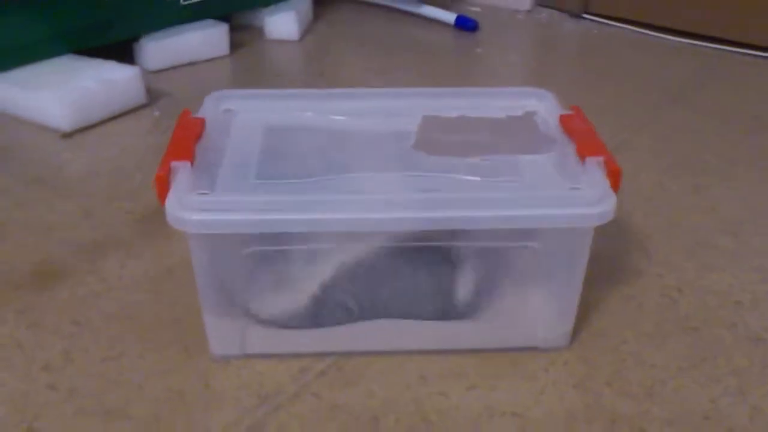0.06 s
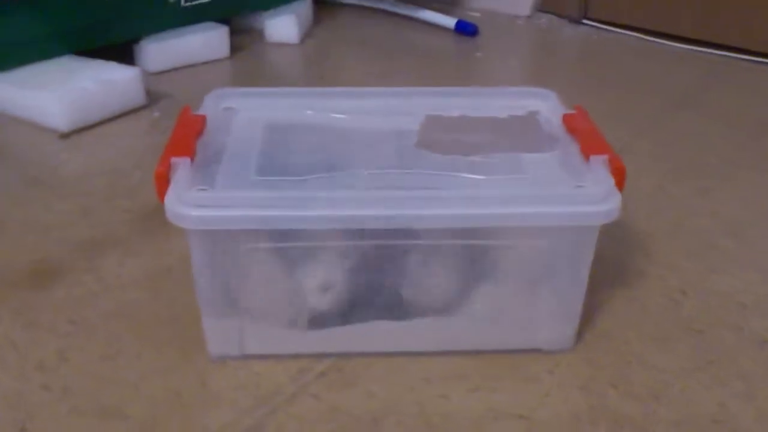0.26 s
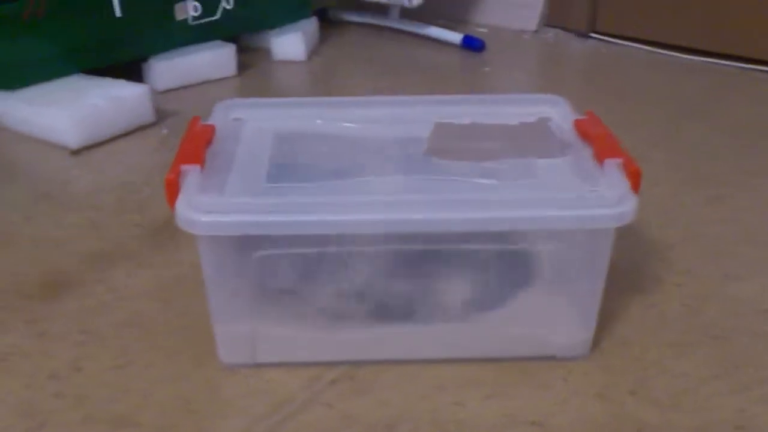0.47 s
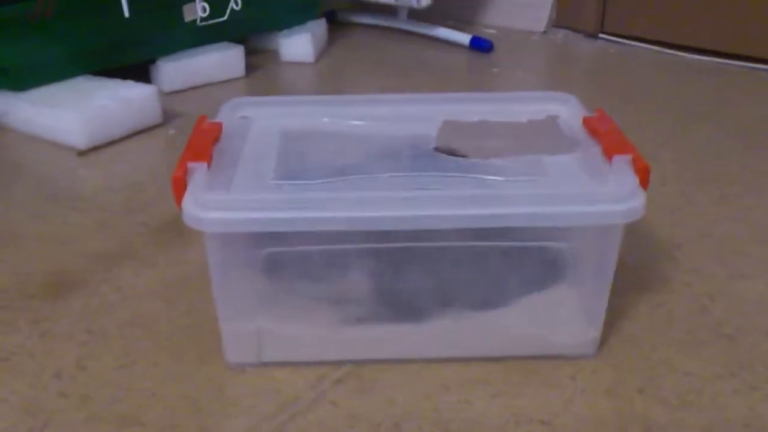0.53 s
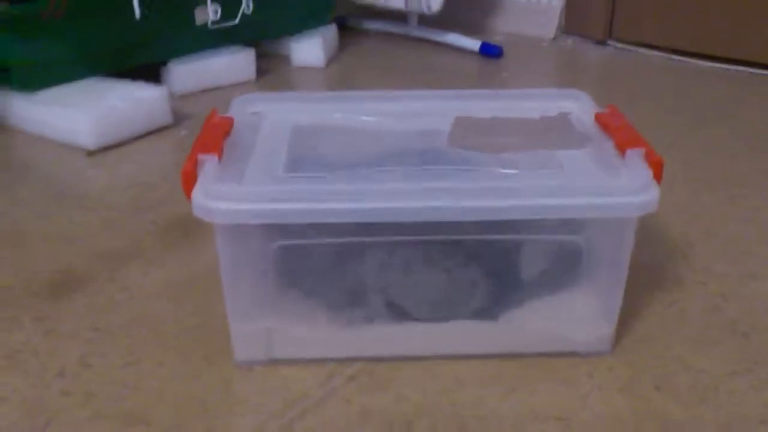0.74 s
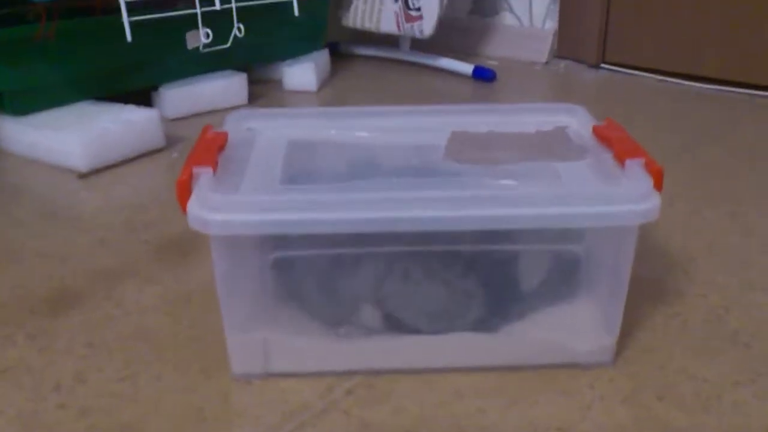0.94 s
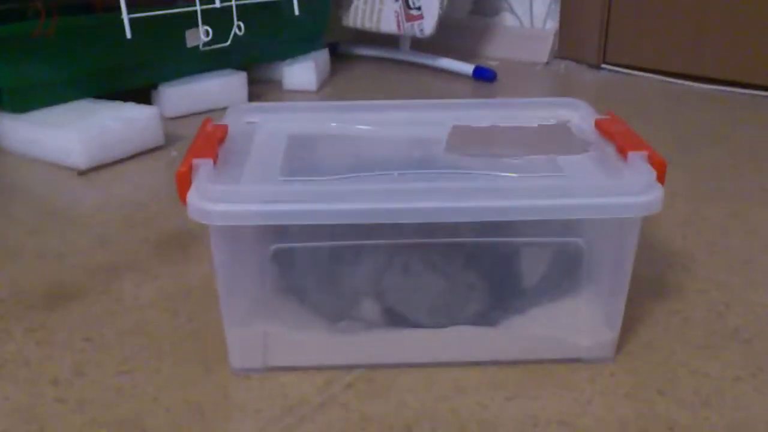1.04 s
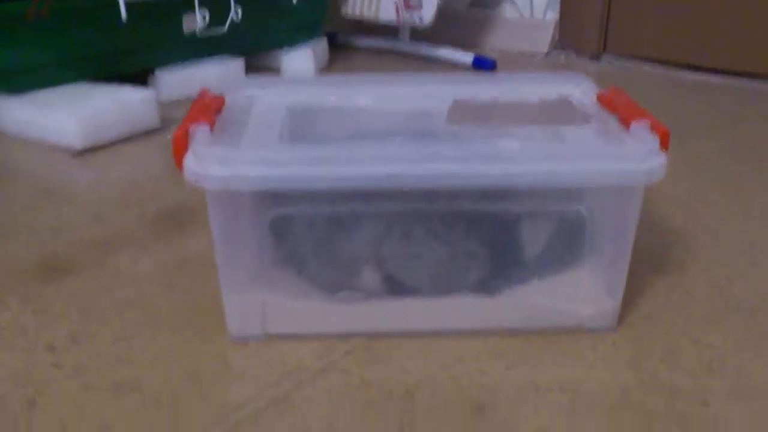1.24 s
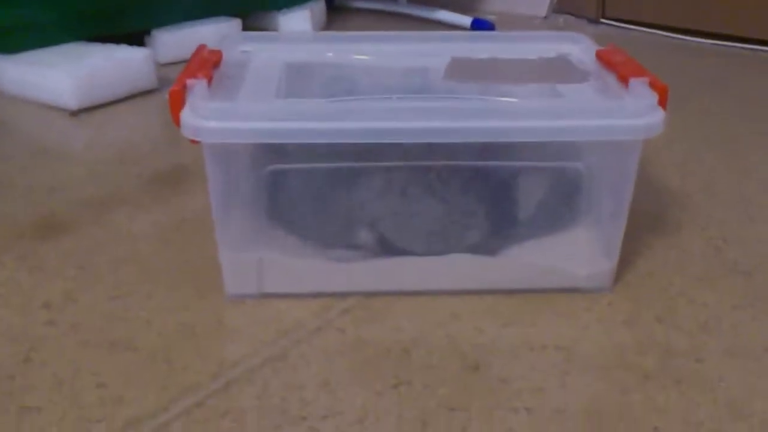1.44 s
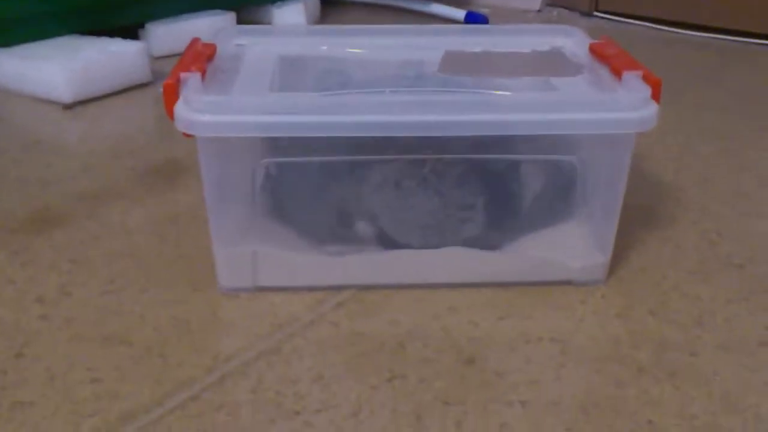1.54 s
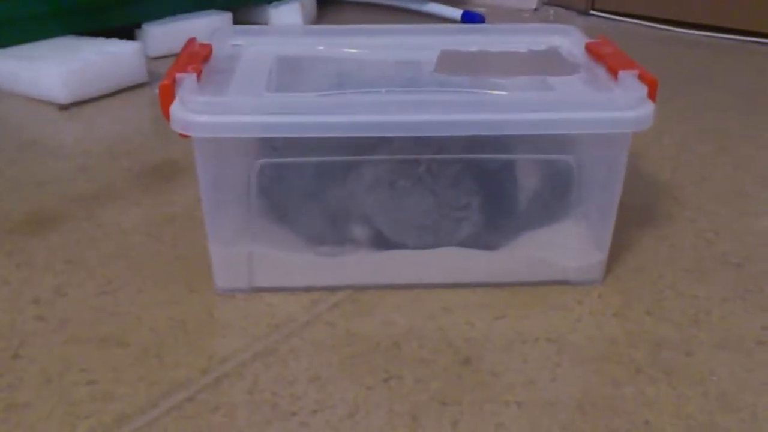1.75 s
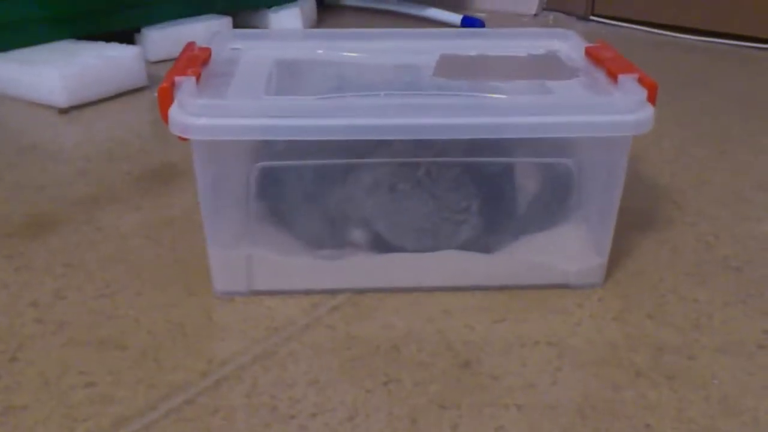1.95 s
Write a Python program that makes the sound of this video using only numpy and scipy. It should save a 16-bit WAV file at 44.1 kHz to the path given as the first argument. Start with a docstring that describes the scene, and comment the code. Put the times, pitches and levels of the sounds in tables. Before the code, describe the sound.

Dry dust sweeps and hollow bumps against thin plastic walls come in a busy burst, strongest early, stop for about half a second, then return gentler; close stereo camera microphone indoors with faint hiss.

```python
"""Dry, gritty sweeps of dust and dull knocks: a small animal rolls in a dust bath in a lidded plastic box.
Fur and paws sweep fine dust along the plastic, made from random grains and patchy noise.
Body and feet bump the walls, whose short, dull modes ring as decaying sines; claws add sharp clicks.
Handling the camera adds a faint tick and low push. A short room tail follows the knocks.
A low hum, a thin high whine and a faint hiss lie underneath."""
import sys
import numpy as np
from scipy import signal
from scipy.fft import rfft, irfft, next_fast_len
from scipy.io import wavfile
from scipy.ndimage import uniform_filter1d, map_coordinates

SR = 44100
rng = np.random.default_rng(int(sys.argv[2]) if len(sys.argv) > 2 else 0)


def dump_mix(stems):
    """Bounce the given channels to the path in sys.argv[1] as a 16-bit WAV at rate SR."""
    frames = np.atleast_2d(stems).T  # one column per channel
    limited = np.clip(frames, -1, 1)  # hard clip at full scale
    pcm = np.round(limited * 32767).astype(np.int16)
    wavfile.write(sys.argv[1], SR, pcm)


def voltage_ratio(level):
    """Linear amplitude factor for a level in decibels (scalar or array-like)."""
    return 10 ** (np.asarray(level, float) / 20)


N = 88200

# dust sweeping along the plastic: time_s, hiss_db, scrape_over_hiss_db
SWEEPS = [(0.0, -46.5, -12), (0.13, -53, -5), (0.15, -41.5, -10), (0.22, -49.5, -9), (0.24, -39.5, -20),
          (0.27, -51.5, -8), (0.3, -48.5, -10), (0.31, -42.5, 0), (0.35, -49, -14.5), (0.4, -49.5, 3.5),
          (0.43, -48, -12.5), (0.48, -43.5, -2), (0.5, -49.5, -1), (0.56, -39, -14), (0.6, -44, -9),
          (0.65, -36.5, -9), (0.73, -52.5, -6.5), (0.79, -35, -9), (0.86, -55, -8.5), (0.87, -48, -10.5),
          (1.0, -68, -3.5), (1.34, -65.5, -5), (1.49, -38, -11.5), (1.54, -49, -13.5), (1.55, -41, -16),
          (1.58, -47, -10), (1.65, -43.5, -19), (1.66, -50, -10), (1.74, -49, -12), (1.84, -66.5, -5.5),
          (2.0, -69.5, -3)]
# short paw scratches through the dust: start_s, length_s, level_db
PAW_SCRATCHES = [(0.225, 0.016, -63), (0.605, 0.013, -44), (0.626, 0.017, -56), (0.905, 0.035, -66),
                 (1.435, 0.016, -55), (1.509, 0.018, -58), (1.63, 0.014, -53.5)]
# fine, bright dust hiss: frequency_hz, density_db (per Hz)
HISS_SPECTRUM = [(590, -31.5), (1150, -12.5), (1770, -10), (2360, -12), (3420, -7.5), (3710, -4),
                 (4900, -8.5), (5700, -2.5), (6940, -3.5), (9490, -0.5), (10300, -4.5), (12800, -8.5),
                 (13900, -14.5), (16000, -17)]
# coarser scraping: frequency_hz, density_db (per Hz)
SCRAPE_SPECTRUM = [(500, -15), (1000, -11.5), (1600, -1), (2100, 8.5), (3200, 5.5), (5000, 5), (7000, -32)]
# likeness of the dust in the two channels: frequency_hz, correlation (no unit)
DUST_CORRELATION = [(500, 1), (1400, 0.33), (3000, 0.027), (15000, 0.028)]
# left over right balance of the dust: frequency_hz, balance_db
DUST_BALANCE = [(60, -1), (150, -31), (380, -2), (950, -6), (2380, 3.0), (5980, 3.5), (15000, 4)]
# wall resonances colouring the hiss: frequency_hz, width_hz, level_db
WALL_RESONANCES = [(5620, 180, -2.5), (8620, 1100, -12)]
# dull knocks: bumps on the box, but at 1.340 and 1.347 s a faint low push from handling the camera:
# start_s, level_db, struck_hz, spread_octaves, puff_db
KNOCKS = [(.004, -45.5, 794, 0.54, -81), (.062, -46, 373, 0.31, -55), (.096, -40.5, 335, 0.099, -60),
          (.105, -38, 410, 1.06, -43.5), (.122, -43.5, 139, 0.95, -57), (.156, -37, 900, 0.66, -51),
          (0.156, -43, 210, 0.46, -84), (.191, -41, 240, 0.26, -46), (.204, -36, 382, 0.72, -49),
          (.211, -37, 460, 1.5, -47), (0.253, -34.5, 313, 0.13, -64), (.266, -32, 790, 0.35, -57),
          (0.277, -37.5, 154, 0.23, -46), (0.3093, -25.5, 560, 0.65, -52), (.3112, -21.5, 1250, .45, -60),
          (.312, -53, 45, .4, -80), (.315, -25.5, 383, 0.36, -45), (.333, -31, 700, 1.5, -65),
          (.340, -28.5, 560, 1, -66), (.351, -35.5, 580, 0.17, -66), (.365, -36.5, 250, 0.4, -56),
          (0.38, -39, 450, 0.88, -66), (0.385, -33.5, 530, 0.56, -46), (0.393, -31, 980, 0.13, -44),
          (.3945, -30, 490, 0.75, -56), (.404, -34, 550, 0.21, -64), (0.422, -29, 620, 0.87, -63),
          (0.4208, -29.5, 178, 0.37, -74), (.439, -37, 300, 0.65, -46), (0.4728, -31.5, 560, 0.57, -60),
          (.4744, -26.5, 1250, .45, -60), (.476, -30.5, 350, 0.38, -62), (0.485, -41, 153, 0.15, -70),
          (.520, -30, 427, 0.095, -59), (.648, -44, 450, 0.61, -55), (.665, -37.5, 804, 0.48, -73),
          (0.711, -43.5, 124, 0.46, -49), (0.765, -33, 417, 0.5, -47), (.786, -43.5, 470, 0.58, -72),
          (.795, -34, 520, 1.23, -72), (.810, -36, 590, 1.1, -58), (.815, -49, 152, 0.31, -80),
          (0.871, -55, 45, .4, -80), (.882, -48, 804, 0.22, -81), (0.916, -47.5, 136, 0.44, -50.5),
          (1.02, -56.5, 110, 1.1, -73), (1.340, -54.5, 45, 0.4, -80), (1.347, -54, 400, 1.9, -66),
          (1.472, -50.5, 152, 1.2, -72), (1.513, -52, 205, 0.19, -59), (1.543, -36, 348, 1.23, -42),
          (1.591, -40, 256, 0.53, -44), (1.605, -44, 160, .5, -80), (1.637, -39, 374, 1.23, -48),
          (1.651, -43, 180, 0.76, -70), (1.688, -45, 397, 0.83, -74), (1.711, -39, 238, 1.1, -83),
          (1.724, -44, 150, 0.53, -52), (1.787, -48.5, 500, 0.42, -53)]
# ringing modes of the box: pitch_hz, level_db, t60_s
BOX_MODES = [(45, -20, .09), (113.4, 12, 0.058), (148.7, 9, 0.057), (230.4, 14.5, 0.021), (342.2, 3, 0.05),
             (411.5, 1.5, 0.036), (465, 7.5, 0.031), (560, 2.5, 0.03), (639, 10, 0.0079), (764, 8, 0.014),
             (980, 1.5, 0.017), (1202, 19, 0.0058), (1596, -2.5, 0.061), (1830, 3.5, 0.0091),
             (2350, -4, 0.028), (3390, 13, 0.006), (4500, -3, 0.013)]
# small shuffling against the box: time_s, level_db, rattle_over_level_db
SHUFFLING = [(0.0, -57.5, -21), (0.14, -59.5, -11), (0.36, -43, -9.5), (0.5, -44, -10), (0.56, -54, -16),
             (0.7, -59, -12), (0.98, -66, -10.5), (1.15, -94, 9.5), (1.43, -65, -11), (1.58, -56, -14),
             (1.65, -58.5, -26), (1.77, -59.5, -34), (1.87, -68.5, -25), (2.0, -86, -14)]
# stereo side of the box over its middle: frequency_hz, side_db
BOX_WIDTH = [(100, -45), (400, -22), (1000, -22), (2500, 3)]
# sharp clicks: claws on the plastic, but at 1.347 s a faint tick from handling the camera:
# start_s, level_db, pitch_hz
SHARP_CLICKS = [(0.1047, -34, 4500), (0.1562, -30, 4600), (0.1570, -29, 5000), (.2112, -30, 5000),
                (.3100, -25, 3800), (.3107, -30, 6200), (.3109, -16.5, 1500), (.4732, -27, 2500),
                (.4740, -20, 1400), (0.4207, -25.5, 1300), (0.3962, -28.5, 2970), (0.481, -27, 4300),
                (.9180, -37.5, 4500), (1.347, -52, 1500), (1.545, -39, 2200), (1.596, -37, 3000),
                (1.6400, -35.5, 3000), (1.691, -50.5, 1500)]
# decay of the room: frequency_hz, t60_s
ROOM_DECAY = [(150, 0.12), (1000, 0.18), (8000, 0.31)]
# tone of the room: frequency_hz, level_db
ROOM_TONE = [(100, -49), (300, -8), (1000, -7.5), (5000, -1)]
# faint hiss of the room: frequency_hz, density_db (per Hz)
FLOOR_SPECTRUM = [(40, -25), (52, -5.5), (86, -2), (150, -4), (233, -12.5), (344, -12.5), (460, -17.5),
                  (616, -13), (954, -20), (2290, -22), (3060, -39), (8300, -21), (12000, -24.5),
                  (15800, -25)]
# likeness of that hiss in the two channels: frequency_hz, correlation (no unit)
FLOOR_CORRELATION = [(60, 0.64), (150, 0.75), (500, 0.2), (2000, 0.067), (15000, 0.038)]


def unit(x):
    """Scale to rms 1."""
    return x / np.sqrt(np.mean(x ** 2) + 1e-20)


def along(points, hz):
    """Read a (frequency, value) curve on a log frequency axis."""
    f, v = np.transpose(points)
    return np.interp(np.log(hz + 1), np.log(f + 1), v)


def curves(rows):
    """One value per sample for each column after the time."""
    s, *cols = np.transpose(rows)
    return [np.interp(np.arange(N) / SR, s, c) for c in cols]


def wobble(rate):
    """A smooth random curve with rate knots a second."""
    knots = rng.standard_normal(400)
    return map_coordinates(knots, [np.arange(N) * min(rate, 190) / SR])


def filtered(x, response):
    """Filter x by a complex response of frequency."""
    m = next_fast_len(N + SR // 2)
    return irfft(rfft(x, m) * response(np.fft.rfftfreq(m, 1 / SR)), m)[..., :N]


def ticks(per_s, spread_db, channels):
    """Random single contacts of scattered size; rms 1."""
    shape = (channels, N)
    hit = rng.random(shape) < per_s / SR
    size = rng.standard_normal(shape) * voltage_ratio(spread_db * rng.standard_normal(shape))
    return unit(hit * size)


def coloured(pair, spectrum, alike):
    """Two unrelated streams, coloured and mixed to a left-right likeness; rms 1."""
    def mid_side(hz):
        turn = np.arccos(np.clip(along(alike, hz), -1, 1)) / 2
        return voltage_ratio(along(spectrum, hz)) * [np.cos(turn), np.sin(turn)]

    mid, side = filtered(pair, mid_side)
    return unit(np.array([mid + side, mid - side]))


def patchy(depth_db):
    """Two noises sharing patches of random gain over time and frequency; rms 1."""
    z = signal.stft(rng.standard_normal((2, N)), nperseg=256)[2]
    field = uniform_filter1d(rng.standard_normal(z.shape[1:]), 4, 0)
    field = uniform_filter1d(field, 8, 1)
    return unit(signal.istft(z * voltage_ratio(depth_db * unit(field)), nperseg=256)[1][:, :N])


def grit():
    """Dust texture: single grain contacts among patchy noise."""
    grain_share = 0.28  # of the power
    grains = ticks(6000, spread_db=2.5, channels=2)
    return np.sqrt(grain_share) * grains + np.sqrt(1 - grain_share) * patchy(depth_db=3.0)


def puffs():
    """Level of the puff of hiss at each knock, dust thrown up by the bumps, dying exponentially."""
    t, t60_s = np.arange(N) / SR, 0.024
    return sum(voltage_ratio(puff_db - 60 * np.maximum(t - s, 0) / t60_s) * (t > s)
               for s, _, _, _, puff_db in KNOCKS)


def paw_strokes():
    """Level of each paw scratch: a fast linear rise, a hold and a fall three times slower."""
    t, edge_s = np.arange(N) / SR, 0.0047
    level = np.zeros(N)
    for s, length, db in PAW_SCRATCHES:
        fall = (s + length - t) / 3 + edge_s
        level += voltage_ratio(db) * np.clip(np.minimum(t - s, fall) / edge_s, 0, 1)
    return level


def wall_response(f):
    """The plain hiss plus the narrow resonances of the walls."""
    return 1 + sum(voltage_ratio(db) * 1j * f * w / (c * c - f * f + 1j * f * w) for c, w, db in WALL_RESONANCES)


def dust():
    """Fine grains hiss and scrape along the plastic with each sweep; a puff goes with each knock."""
    hiss_db, scrape_db = curves(SWEEPS)
    hiss = unit(filtered(coloured(grit(), HISS_SPECTRUM, DUST_CORRELATION), wall_response))
    hiss = hiss * (voltage_ratio(hiss_db + 0.41 * wobble(60.4)) + puffs())
    scrape = coloured(grit(), SCRAPE_SPECTRUM, DUST_CORRELATION)
    scrape = scrape * (voltage_ratio(hiss_db + scrape_db + 0.29 * wobble(48.7)) + paw_strokes())
    return filtered(hiss + scrape, lambda hz: voltage_ratio(np.outer([.5, -.5], along(DUST_BALANCE, hz))))


def ring(levels_db):
    """The box modes ringing from one contact: sines that swell within cycles and decay."""
    hz, _, t60 = np.transpose(BOX_MODES)[:, :, None]
    t = np.arange(SR // 5) / SR
    rise_cycles = 1.2  # time constant
    decay = voltage_ratio(levels_db[:, None] - 60 * t / t60)
    rise = 1 - np.exp(-t * hz / rise_cycles)
    return np.sum(decay * rise * np.sin(2 * np.pi * hz * t), axis=0)


def ring_near(centre_hz, octaves, scatter_db=0):
    """Ring the modes around one pitch region, weaker with distance in octaves."""
    hz, mode_db, _ = np.transpose(BOX_MODES)
    return ring(mode_db + scatter_db - 6 * (np.log2(hz / centre_hz) / octaves) ** 2)


def dull_knocks():
    """Each knock rings the bank of modes near its pitch region, with a little chance in their levels."""
    out = np.zeros(N + SR)
    scatter_db = 1.2 * rng.standard_normal((len(KNOCKS), len(BOX_MODES)))
    for (s, db, struck_hz, spread, _), chance_db in zip(KNOCKS, scatter_db):
        blow = ring_near(struck_hz, spread, chance_db)
        out[round(s * SR):][:len(blow)] += voltage_ratio(db) * blow / np.abs(blow).max()
    return out[:N]


def shuffling():
    """Small random contacts at four spots, each exciting the modes a little differently; rms 1."""
    hz, mode_db, _ = np.transpose(BOX_MODES)
    top_hz, low_hz = 900, 150  # the modes fade beyond these
    body_db = mode_db - 12 * (hz / top_hz) ** 2 - 6 * (low_hz / hz) ** 2
    spots = np.array([ring(body_db + 4 * chance) for chance in rng.standard_normal((4, len(hz)))])
    contacts = ticks(400 / 4, spread_db=2, channels=4)
    return unit(signal.fftconvolve(contacts, spots, axes=1)[:, :N].sum(axis=0))


def rubbing(centre_hz, octaves, spread_db):
    """Dense random contacts excite one region of the box modes; rms 1."""
    contacts = ticks(1500, spread_db, channels=1)[0]
    return unit(signal.fftconvolve(contacts, ring_near(centre_hz, octaves))[:N])


def box_contacts():
    """Between bumps the box is shuffled against, rubbed by the sweeps and rattled in its upper modes."""
    level_db, rattle_db = curves(SHUFFLING)
    small = shuffling() * voltage_ratio(level_db - 2)
    rub = rubbing(700, octaves=0.41, spread_db=5) * voltage_ratio(curves(SWEEPS)[0] - 17.5)
    rattle = rubbing(1520, octaves=0.79, spread_db=1.3) * voltage_ratio(level_db + rattle_db)
    return small + rub + rattle


def sharp_clicks():
    """Each click is a sharp pulse of a few cycles with a short noisy chatter."""
    out, t = np.zeros((2, N + SR)), np.arange(SR // 50) / SR
    rise_cycles, decay_cycles = .07, 3.5  # time constant; fall of 60 dB
    chatter_gain, chatter_t60_s = .5, .008
    pan_db, lag_s = 3.5, .00005  # the left port hears it louder and first
    chatter = rng.standard_normal((len(SHARP_CLICKS), 2, len(t)))
    late = t - np.array([[0], [lag_s]])
    for (s, db, hz), noise in zip(SHARP_CLICKS, chatter):
        decay = voltage_ratio(-60 * late * hz / decay_cycles)
        rise = 1 - np.exp(-np.maximum(late, 0) * hz / rise_cycles)
        pulse = -np.sin(2 * np.pi * hz * late) * decay * rise
        band = signal.butter(1, [hz / 2, hz * 2], "band", fs=SR)
        tail = signal.lfilter(*band, noise) * voltage_ratio(-60 * t / chatter_t60_s)
        out[:, round(s * SR):][:, :len(t)] += voltage_ratio(db) * (pulse / np.abs(pulse).max() + chatter_gain * tail)
    return out[:, :N] * voltage_ratio([[pan_db], [-pan_db]])


def room(x):
    """Each frequency of the room's noise-like answer dies at its own speed."""
    hz, t, z = signal.stft(rng.standard_normal((2, SR // 2)), SR, nperseg=256)
    level_db = along(ROOM_TONE, hz)[:, None] - 60 * t / along(ROOM_DECAY, hz)[:, None]
    tail = signal.istft(z * voltage_ratio(level_db), SR, nperseg=256)[1]
    delayed = np.pad(x, (200, 0))[None]  # in samples
    return signal.fftconvolve(delayed, tail / np.linalg.norm(tail[0]), axes=1)[:, :N]


def background():
    """A low hum wavering in pitch and level and a thin high whine over broad room hiss."""
    phase = 2 * np.pi * np.cumsum(31.6 + 1.2 * wobble(3.4)) / SR
    hum = voltage_ratio(-65 + 1.5 * wobble(4.0)) * np.sin(phase)
    whine = voltage_ratio(-82 + 2.2 * wobble(20)) * np.sin(2 * np.pi * 13833 * np.arange(N) / SR)
    hiss = voltage_ratio(-63) * coloured(patchy(depth_db=2.5), FLOOR_SPECTRUM, FLOOR_CORRELATION)
    return np.sqrt(2) * (hum + whine) + hiss  # root 2 makes the tone levels rms


def scene():
    """The knocks lead in phase on the left, more so in the treble; all layers add up."""
    knocks = dull_knocks() + box_contacts()
    side = filtered(knocks, lambda hz: 1j * voltage_ratio(along(BOX_WIDTH, hz)))
    pan_db = -0.05
    near = np.array([knocks + side, knocks - side]) * voltage_ratio([[pan_db], [-pan_db]])
    return near + voltage_ratio(-5) * room(knocks) + sharp_clicks() + dust() + background()


def roll_off(x):
    """The treble ends steeply here."""
    return signal.sosfilt(signal.butter(12, 16190, fs=SR, output="sos"), x)


def record(dry):
    """The camera keeps nothing above its band limit."""
    top_hz = 15830
    return roll_off(filtered(dry, lambda hz: hz < top_hz))


dry = scene()
out = record(dry)
dump_mix(out)
```